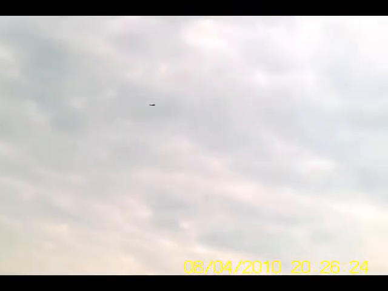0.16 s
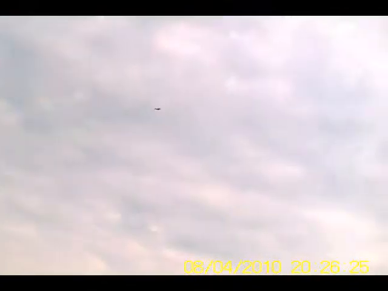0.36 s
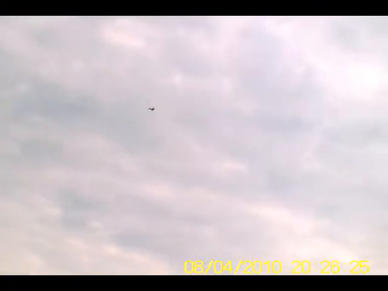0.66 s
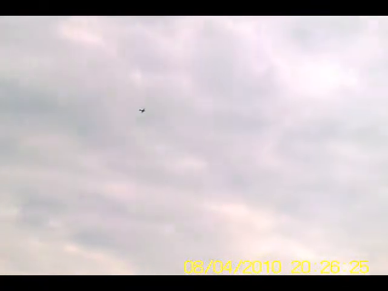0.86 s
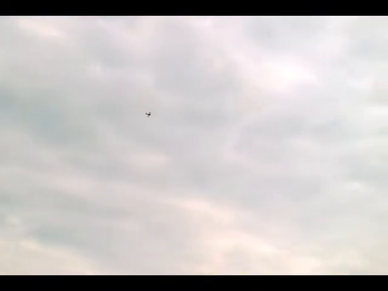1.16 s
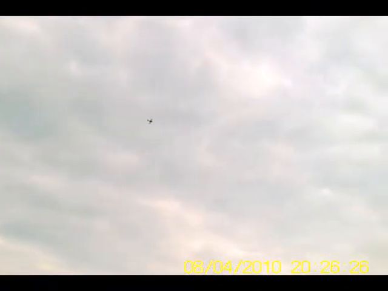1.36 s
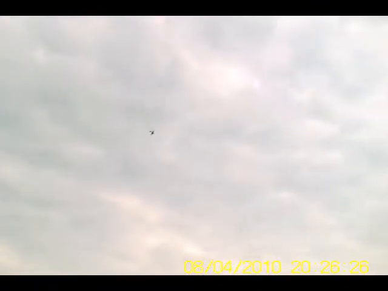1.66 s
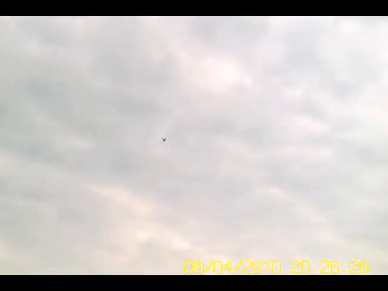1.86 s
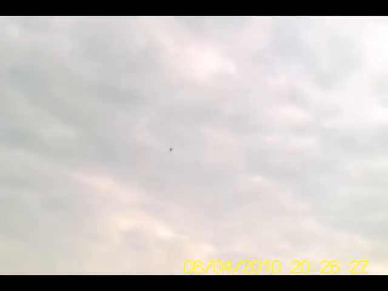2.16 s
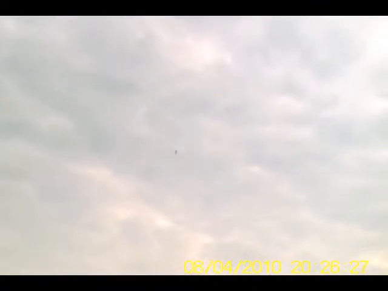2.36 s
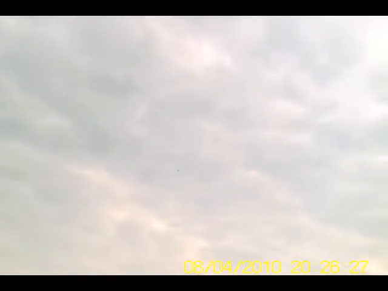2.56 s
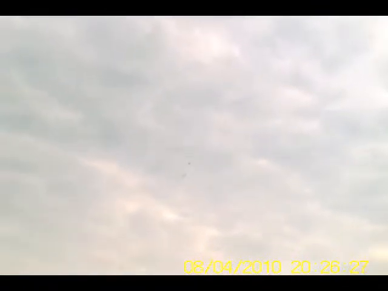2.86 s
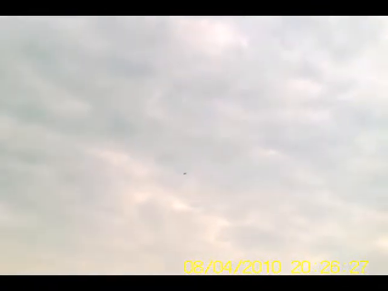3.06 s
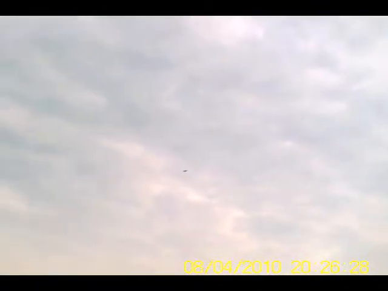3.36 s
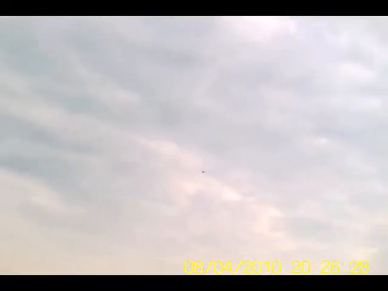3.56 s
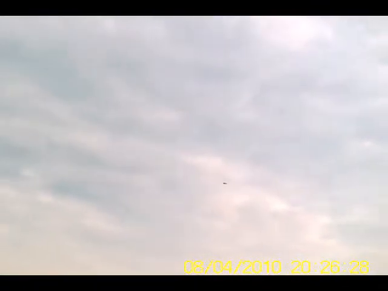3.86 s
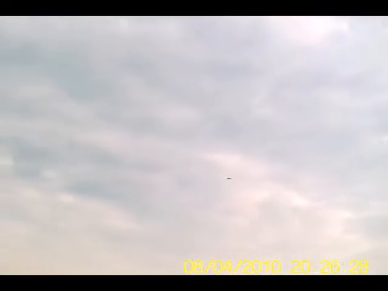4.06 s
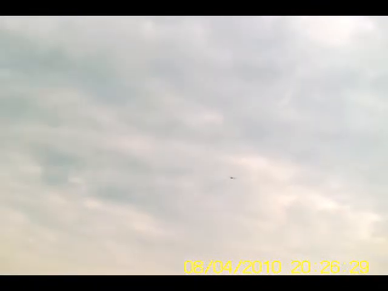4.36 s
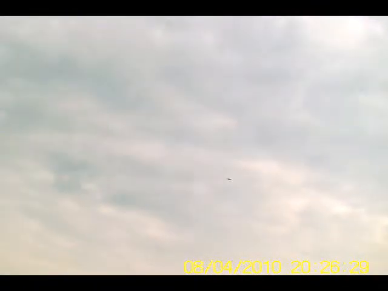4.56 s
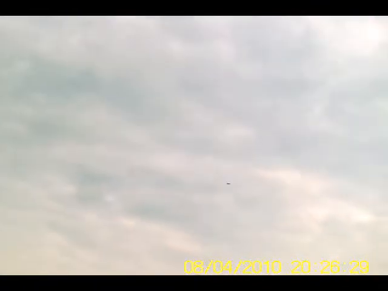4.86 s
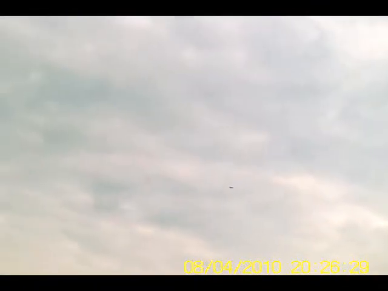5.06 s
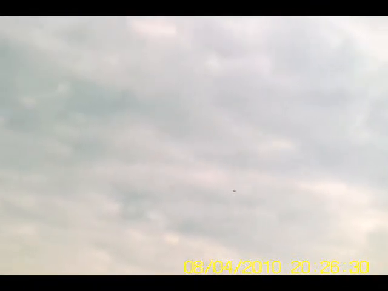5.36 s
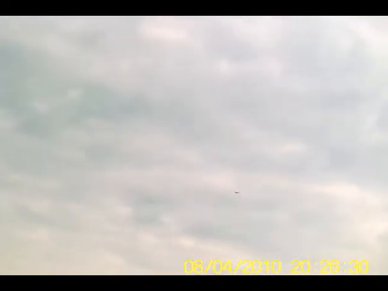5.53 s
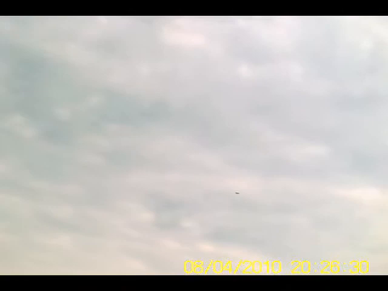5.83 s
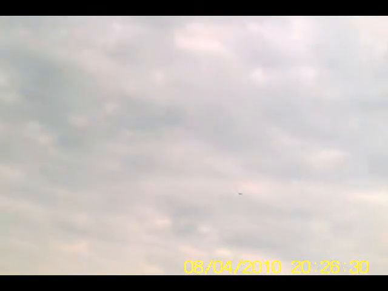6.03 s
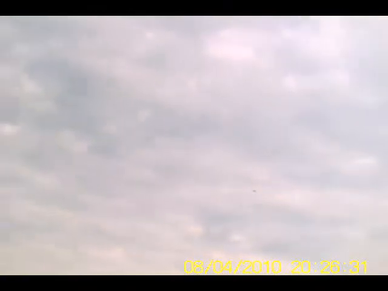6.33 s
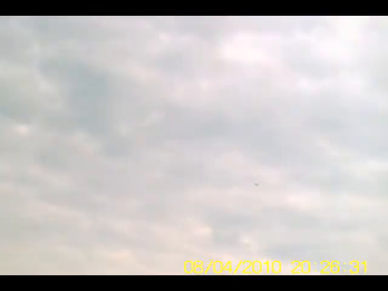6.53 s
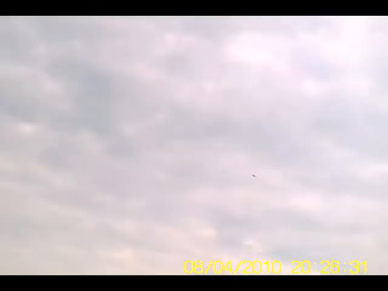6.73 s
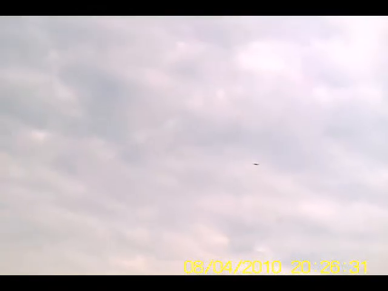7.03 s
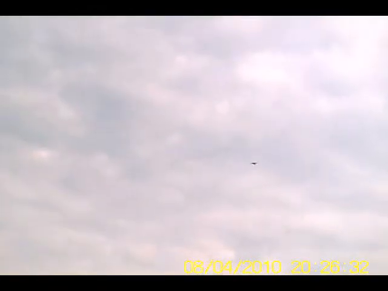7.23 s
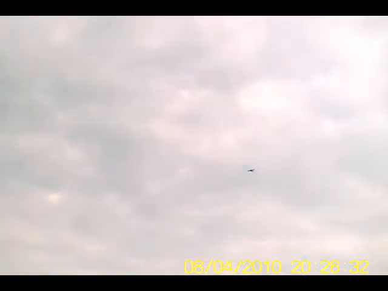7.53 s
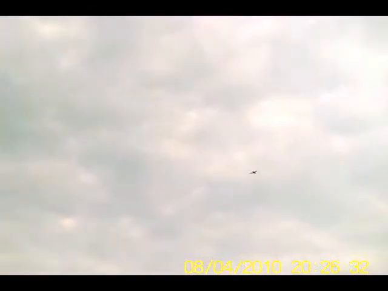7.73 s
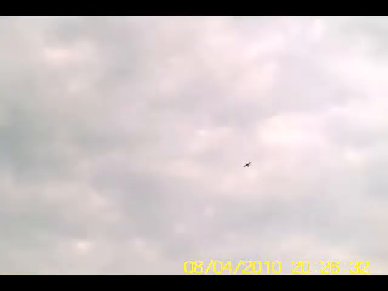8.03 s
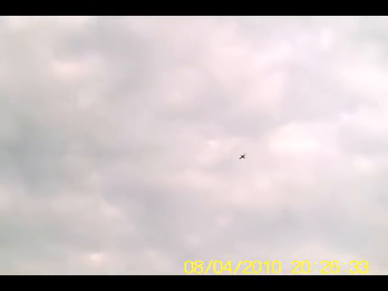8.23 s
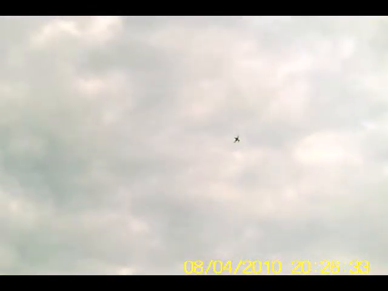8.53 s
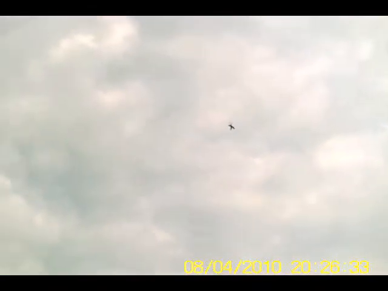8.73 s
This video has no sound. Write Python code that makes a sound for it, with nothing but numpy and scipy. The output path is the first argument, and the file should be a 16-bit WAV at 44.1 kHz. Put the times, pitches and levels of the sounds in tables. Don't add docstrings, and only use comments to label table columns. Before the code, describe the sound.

Far traffic roar and low wind rumble on a small microphone, a faint electric model plane whine, then gusts thump and flutter as it nears.

```python
import sys
import numpy as np
from scipy import signal
from scipy.fft import rfft, irfft, next_fast_len
from scipy.io import wavfile
from scipy.ndimage import uniform_filter1d, map_coordinates

SR = 44100
rng = np.random.default_rng(int(sys.argv[2]) if len(sys.argv) > 2 else 0)


def dump_mix(stems):
    frames = np.atleast_2d(stems).T
    limited = np.clip(frames, -1, 1)
    pcm = np.round(limited * 32767).astype(np.int16)
    wavfile.write(sys.argv[1], SR, pcm)


def field_ratio(decibels):
    return 10 ** (np.asarray(decibels, dtype=float) / 20)


N = 392137
OVERLOAD_S = 6.99076
KNEE_DB = 1.36


def unit(x):
    return x / np.sqrt(np.mean(x ** 2) + 1e-20)


def curves(rows):
    time_s, *columns = np.transpose(rows)
    return np.array([np.interp(np.arange(N) / SR, time_s, c) for c in columns])


def wobble(rate_hz):
    coarse = np.arange(0, N + 32, 32)
    knots = rng.standard_normal(int(N * rate_hz / SR) + 4)
    return np.interp(np.arange(N), coarse, map_coordinates(knots, [coarse * rate_hz / SR]))


def bell(s, span_s):
    reach_s = 4 * abs(span_s)
    near = np.arange(max(int((s - reach_s) * SR), 0), min(int((s + reach_s) * SR), N))
    out = np.zeros(N)
    out[near] = np.exp(-((near / SR - s) / span_s) ** 2)
    return out


def soft_max(a_db, b_db):
    return KNEE_DB * np.logaddexp(a_db / KNEE_DB, b_db / KNEE_DB)


def filtered(x, response):
    m = next_fast_len(N + SR // 2)
    return irfft(rfft(x, m) * response(np.fft.rfftfreq(m, 1 / SR)), m)[..., :N]


def rush(spectrum, patchy_db):
    z = signal.stft(rng.standard_normal(N), nperseg=512)[2]
    field = uniform_filter1d(rng.standard_normal(z.shape), size=6, axis=0)
    field = uniform_filter1d(field, size=12, axis=1)
    white = signal.istft(z * field_ratio(patchy_db * unit(field)), nperseg=512)[1][:N]
    f_hz, db = np.transpose(spectrum)
    return unit(filtered(white, lambda hz: field_ratio(np.interp(np.log(hz + 1), np.log(f_hz + 1), db))))


# time_s, half_span_s, roar_db, engine_db, tyre_db
PASSES = [(.05, 0.42, 0.8, -2, 9), (.75, 0.36, 2, 1, 17), (1.2, 0.18, 2, 2, 15), (1.75, 0.33, 1.5, 1, 17),
          (2.25, 0.28, 0.5, 5.5, 17.5), (2.8, 0.39, 0, 6, 15.5), (3.55, 0.38, 3, 3, -6),
          (4.3, 0.46, 0.36, 4, 7), (4.6, .15, 1.5, 1, -3), (5.05, 0.2, 0.2, 1.5, 12),
          (5.8, 0.061, 1.2, -3, -4), (6.1, 0.15, -1, 1, 8), (6.9, 0.46, -0.1, 0, 7), (7.65, 0.52, 0, 4, 17),
          (8.5, 0.63, 1, 5, 18)]
# freq_hz, density_db
ROAR_SPECTRUM = [(260, -16.5), (450, -11), (564, -4), (787, -2.5), (886, -0.5), (1080, 0.5), (1570, -9),
                 (2000, -25.5), (2300, -20), (2710, -29), (3430, -27.5), (4300, -34), (4700, -34),
                 (6110, -58.5), (10300, -120)]
# freq_hz, density_db
ENGINE_SPECTRUM = [(60, -120), (110, -9), (160, 4.5), (230, -5.5), (300, -7), (400, -9), (500, -5),
                   (700, -24), (1200, -120)]
# freq_hz, density_db
TYRE_SPECTRUM = [(500, -120), (900, -37.5), (1300, -4.5), (1550, -1), (1750, -13), (2100, -37),
                 (3500, -120)]
# freq_hz, density_db
PORT_HISS_SPECTRUM = [(2530, -51), (4300, -30), (4610, -21.5), (5240, -2), (5570, 4), (5850, -3),
                      (6330, -17.5), (6920, -16.5), (7320, -42), (8200, -45.5), (10700, -52), (18000, -120)]


def far_traffic():
    passing = [np.outer(swells_db, bell(s, span_s)) for s, span_s, *swells_db in PASSES]
    roar_db, engine_db, tyre_db = sum(passing)
    roar = field_ratio(roar_db - 0.13 + 0.13 * wobble(2.6)) * rush(ROAR_SPECTRUM, patchy_db=0.24)
    engines = field_ratio(engine_db - 12.5) * rush(ENGINE_SPECTRUM, patchy_db=-0.1)
    tyres = field_ratio(tyre_db - 26.5) * rush(TYRE_SPECTRUM, patchy_db=1.5)
    hiss = field_ratio(-7 + 0.28 * wobble(16)) * rush(PORT_HISS_SPECTRUM, patchy_db=0.35)
    return roar + engines + tyres + hiss


# time_s, strength_db
WIND_STRENGTH = [(0, 10.5), (.35, 9.5), (.7, 4.5), (1.4, 5.5), (2.4, 5), (3, 5.5), (4.2, 4.5), (5, 7),
                 (5.4, 6.5), (5.8, 4.5), (6.2, 6.5), (6.95, 6), (7.05, 2), (7.6, 3.5), (8.2, 10.5),
                 (8.3, 15.5), (8.89, 14)]
# time_s, level_db, half_span_s
PUFFS = [
    (6.85, 2.5, 0.27),
    (8.03, 12.5, 0.045),
    (8.18, 1, .03),
    (8.3, 7, 0.027),
    (8.37, 6, .04),
    (8.44, 5, .03),
    (8.53, 10, 0.045),
    (8.67, -1, .04),
    (8.76, 2, .03),
    (8.86, 6, .05),
]
# freq_hz, density_db
SWELL_SPECTRUM = [(2.4, -34), (4.0, -3.5), (17, 0.5), (49, -11), (70, -19.5), (91, -34.5), (150, -120)]
# freq_hz, density_db
BUFFET_SPECTRUM = [(18, -26), (30, 1), (65, 0), (108, -7), (231, -27), (261, -28.5), (360, -27), (420, -25),
                   (550, -49.5), (920, -120)]
# freq_hz, density_db
FLUTTER_SPECTRUM = [(30, -120), (60, -30), (100, 0), (200, -7), (300, -15), (420, -25), (600, -45),
                    (1000, -120)]


def wind():
    strength_db, = curves(WIND_STRENGTH)
    puff_db = sum(db * bell(s, span_s) for s, db, span_s in PUFFS)
    before_gust = np.arange(N) / SR < OVERLOAD_S
    swell_db = np.where(before_gust, 0.2 + strength_db, 13 + 0.47 * strength_db)
    buffet_db = strength_db + 0.26 * puff_db
    flutter_db = -19 + 1.36 * strength_db + puff_db
    swell = unit(field_ratio(2.26 * wobble(3.37)) * rush(SWELL_SPECTRUM, patchy_db=-0.2))
    buffet = unit(field_ratio(1.17 * wobble(12)) * rush(BUFFET_SPECTRUM, patchy_db=0.52))
    flutter = unit(field_ratio(1.6 * wobble(25)) * rush(FLUTTER_SPECTRUM, patchy_db=0.6))
    return field_ratio(swell_db) * swell + field_ratio(buffet_db) * buffet + field_ratio(flutter_db) * flutter


# freq_hz, wander_hz, level_db, loudest_s, half_span_s
HUMS = [(62.3, 1.216, 3.5, 2.54, 1.26), (60.1, 1.3, 2, 4.77, 0.89), (97.4, 0.806, 0, 3.54, 1.5),
        (125, 1.2, -4.5, 1.3, 1.8), (123.7, 1.2, -7, 6.54, .8), (387.6, .8, -16.5, 3.7, 2.1),
        (423, .5, -19.5, 3.7, 2.6), (3390, 38, -30, 4.1, 1.6)]


def hums():
    out = np.zeros(N)
    for hz, wander_hz, db, s, span_s in HUMS:
        phase = 2 * np.pi * np.cumsum(hz + wander_hz * wobble(4 * wander_hz + 3)) / SR
        out += field_ratio(db + 3 + 1.3 * wobble(4)) * bell(s, span_s) * np.sin(phase)
    return out


# time_s, pitch_hz, level_db
CHIPS = [
    (.17, 3950, -30),
    (4.12, 4350, -33),
    (4.66, 3150, -33),
]


def bird_chips():
    t = np.arange(N) / SR
    out = np.zeros(N)
    for s, hz, db in CHIPS:
        cycles = hz * (t - s) * (1 - 0.55 * (t - s))
        out += field_ratio(db) * bell(s, .03) * np.sin(2 * np.pi * cycles)
    return out


# time_s, rate_hz
BLADE_RATE = [(0, 267), (.8, 263), (1.8, 259), (2.6, 255.5), (3.1, 254.8), (3.5, 257.5), (4.6, 268),
              (5.4, 275.5), (5.9, 312), (6.6, 319.5), (6.9, 321.5), (7.4, 322.8), (8.1, 323.5),
              (8.5, 322.8), (8.89, 321.5)]
ORDERS = [
    1,
    6.5,
    7,
    14,
]
# time_s, level_db
NEARNESS = [(1.8, -32), (2.3, -18), (3.2, -18), (3.6, -15.5), (5.2, -15.5), (5.5, -22), (6.7, -23.5),
            (7.6, -20.5), (7.95, -11.5), (8.89, -10)]
# time_s, level_db, half_span_s
BEAMS = [
    (.2, -31, .6),
    (1.25, -28.5, 0.54),
    (2.85, -21, 0.63),
    (4.75, -30, 0.61),
    (6.8, -30, 0.31),
    (7.4, -31, 0.55),
    (8.25, -23.5, .38),
]


def plane_tones():
    t = np.arange(N) / SR
    pole = sum(field_ratio(db) * bell(s, span_s) for s, db, span_s in BEAMS)
    second_pole = pole * field_ratio(np.maximum(2 - 6 * t, -22))
    sizes = field_ratio(curves(NEARNESS)[0]), field_ratio(-12) * pole, pole, second_pole
    turns = np.cumsum(curves(BLADE_RATE)[0] * (1 + 0.00042 * wobble(11))) / SR
    out = np.zeros(N)
    for order, size in zip(ORDERS, sizes):
        flicker = field_ratio(1.2 * wobble(8))
        out += size * flicker * np.sqrt(2) * np.sin(2 * np.pi * order * turns)
    return out


# freq_hz, density_db
SWISH_SPECTRUM = [(1500, -120), (2400, -40), (3000, -7), (3400, -1), (3900, 0), (4400, -3), (5000, -25),
                  (7000, -120)]
# time_s, lag_ms
ECHO_LAG = [(0, 2.5), (7, 3.6), (8.89, 5.6)]


def tip_swish():
    t = np.arange(N) / SR
    far_db, near_db, closes_db_per_s, nearest_s = -50, -22.5, 11, 8
    level_db = soft_max(far_db, near_db - closes_db_per_s * np.maximum(nearest_s - t, 0))
    swish = rush(SWISH_SPECTRUM, patchy_db=1.5)
    echo = map_coordinates(swish, [np.arange(N) - curves(ECHO_LAG)[0] * SR / 1000])
    return field_ratio(level_db - 1.5) * (swish + .8 * echo)


# time_s, peak_db
TICKS = [
    (2.456, -51),
    (6.910, -48),
    (7.336, -61),
    (8.232, -60),
]


def ticks():
    out, t = np.zeros(N + SR), np.arange(SR // 100) / SR
    for s, db in TICKS:
        decay = field_ratio(db + 13 - 60 * t / .011)
        out[round(s * SR):][:len(t)] += decay * rng.standard_normal(len(t))
    return filtered(out[:N], lambda hz: np.exp(-((hz - 3100) / 1500) ** 2))


# time_s, pressure, half_width_s
PUSHES = [(6.568, 9, .012), (6.718, 10, .011), (6.869, -9, .012), (6.903, 8, .01), (6.93, -8, .014),
          (7.01, -14, .008), (7.117, -25, .03), (7.257, 36, .017), (7.318, -15, .02), (7.385, 19, .016),
          (7.589, 18, .013), (7.658, -16, .025), (8.237, 18, .007), (8.327, 22, .006), (8.36, 22, .005),
          (8.383, 20, .006), (8.68, -20, .008), (8.877, -24, .007), (6.973, 15.5, .009), (6.99, 14, .009)]


def gust_pushes():
    return sum(push * bell(s, width_s) for s, push, width_s in PUSHES)


# start_s, gain_db, ceiling_db
CREEP = [
    (.3, -49.5, -36),
    (7.5, -53.5, -49),
]


def control_db():
    t = np.arange(N) / SR
    creep_db_per_s = 3
    gains_db = []
    for start_s, db, ceiling_db in CREEP:
        rising_db = db + creep_db_per_s * np.maximum(t - start_s, 0)
        gains_db.append(-soft_max(-ceiling_db, -rising_db))
    return np.where(t < OVERLOAD_S, *gains_db)


def scene():
    air = far_traffic() + wind() + hums() + bird_chips() + plane_tones() + tip_swish() + gust_pushes()
    return (air + ticks() / field_ratio(control_db()))[None]


# freq_hz, density_db
PREAMP_SPECTRUM = [(700, -120), (1500, -30), (3000, -3), (5000, -2), (7500, 0), (9500, -1), (10100, -3),
                   (10500, -7), (10900, -17), (11100, -25), (11300, -38), (11600, -120)]


def preamp_hiss(gain_db):
    return field_ratio(-71.5 + 0.69 * (gain_db + 47.5)) * rush(PREAMP_SPECTRUM, patchy_db=0.8)


# freq_hz, level_db
CLOCKS = [
    (3893, -88),
    (7400, -89),
    (9600, -92),
]


def clock_whine():
    t = np.arange(N) / SR
    return sum(field_ratio(db) * np.sqrt(2) * np.sin(2 * np.pi * hz * t) for hz, db in CLOCKS)


def roll_off(x):
    return signal.sosfilt(signal.butter(12, 11170, fs=SR, output="sos"), x)


def record(dry):
    gain_db, t = control_db(), np.arange(N) / SR
    gained = np.pad(dry * field_ratio(gain_db), ((0, 0), (0, 900)), 'reflect')
    limited = filtered(gained, lambda hz: 1 / (1 + (hz / 10400) ** 32))
    stop = np.clip((N / SR - t) / .003, 0, 1)
    offset = -.0085
    return roll_off((limited + preamp_hiss(gain_db) + clock_whine() + offset) * stop)


dry = scene()
out = record(dry)
dump_mix(out)
```